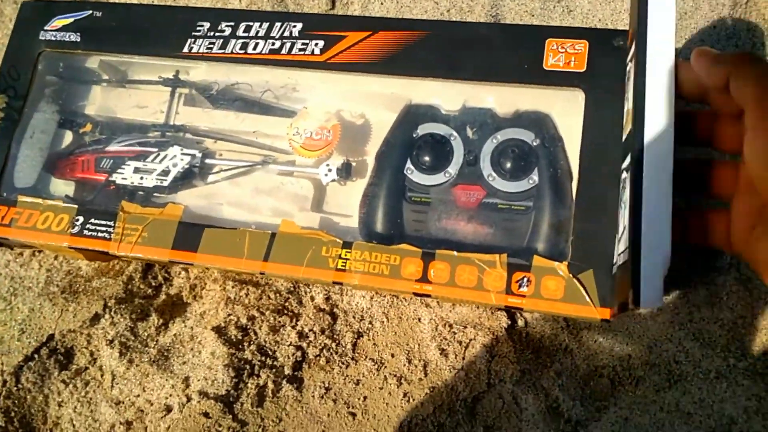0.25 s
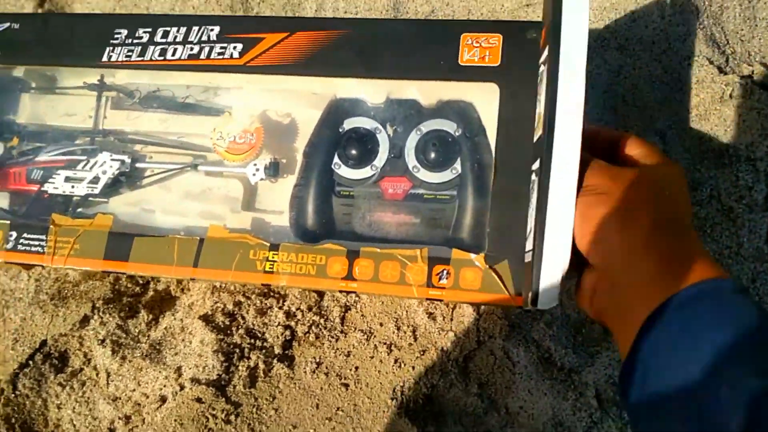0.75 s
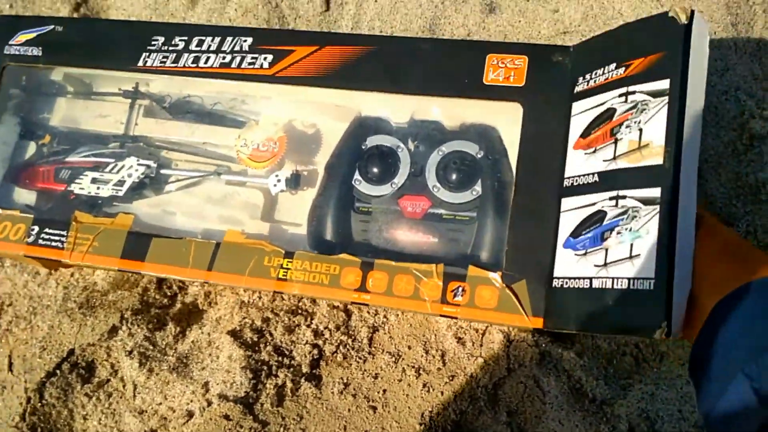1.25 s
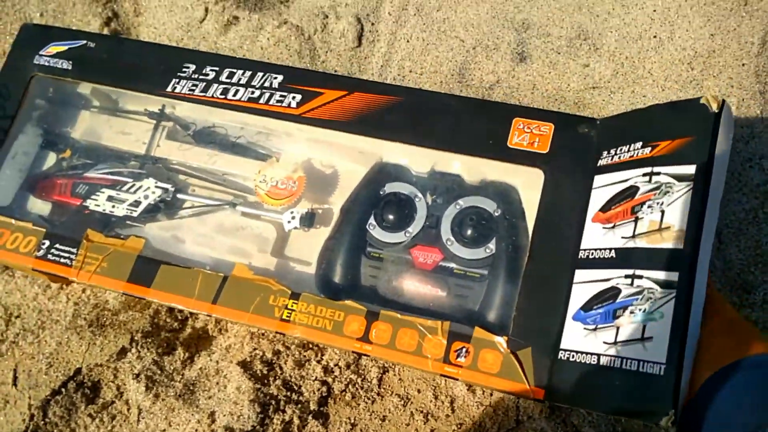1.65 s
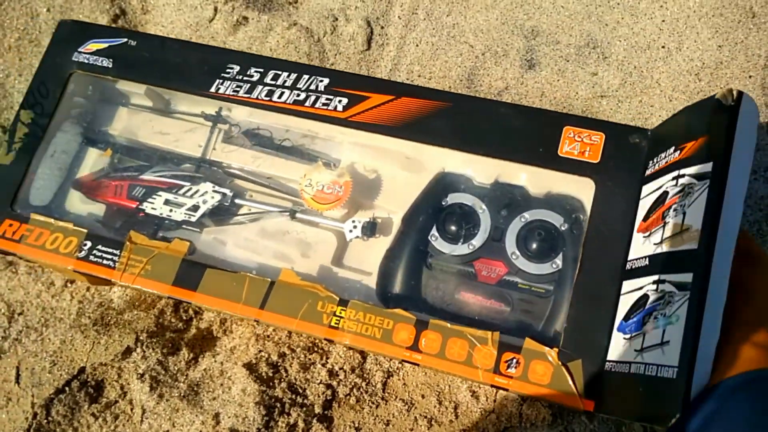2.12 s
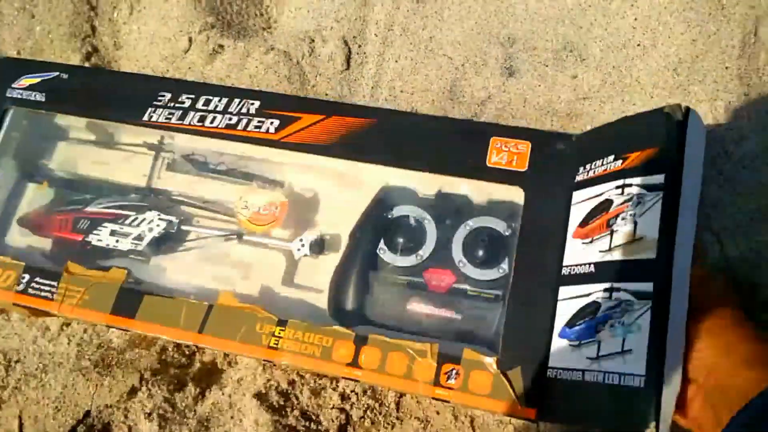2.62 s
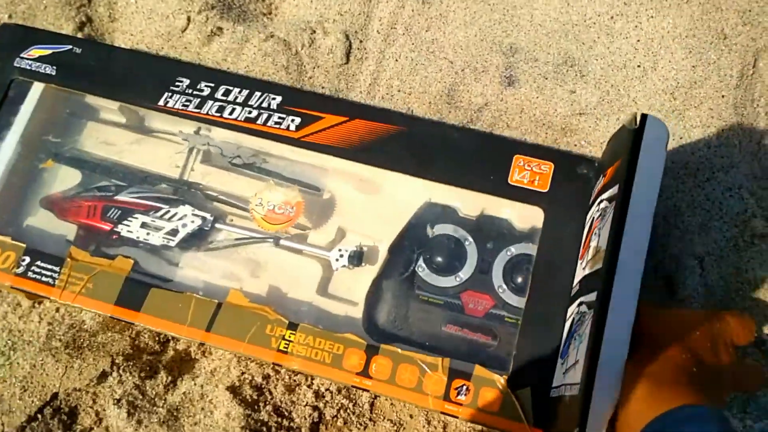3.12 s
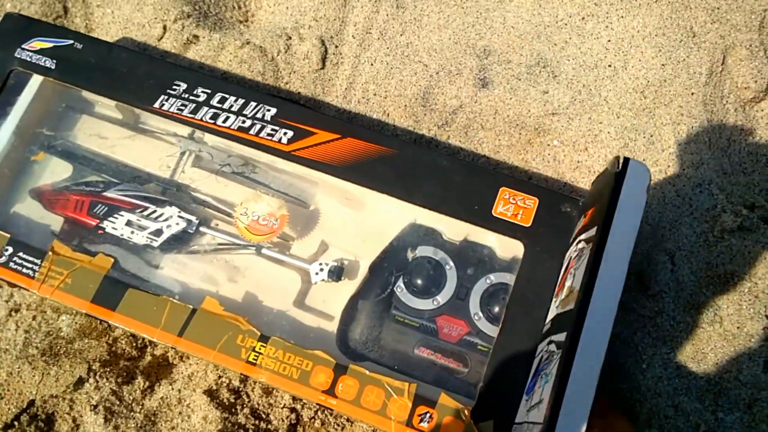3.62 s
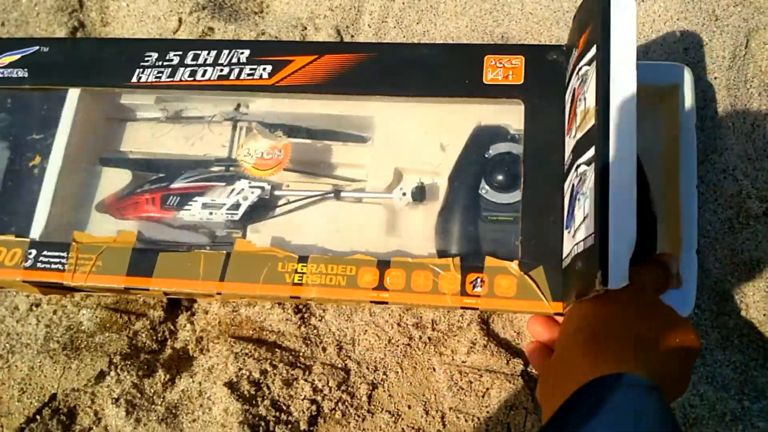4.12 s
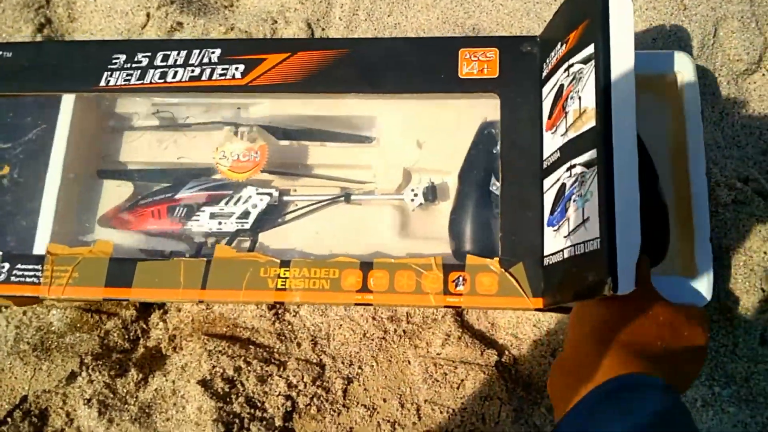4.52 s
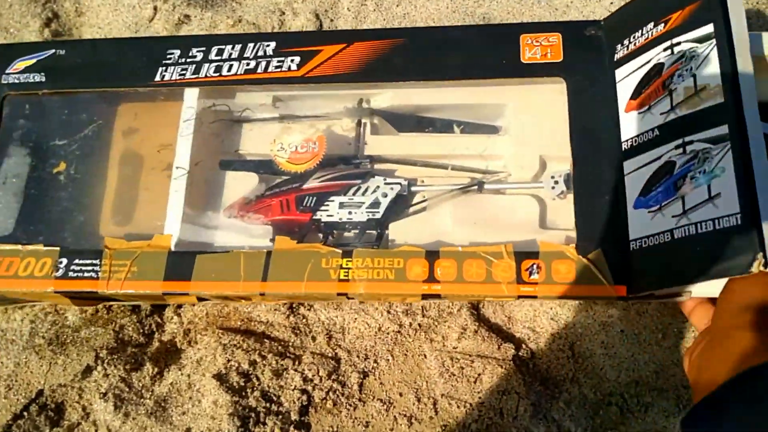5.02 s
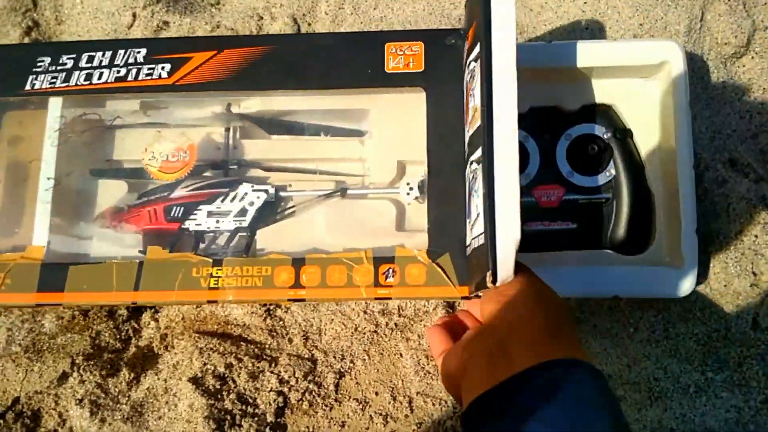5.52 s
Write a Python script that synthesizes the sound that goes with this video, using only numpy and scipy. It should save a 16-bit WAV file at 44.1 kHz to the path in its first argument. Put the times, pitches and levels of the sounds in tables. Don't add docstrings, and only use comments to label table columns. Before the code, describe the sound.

Fingers brush a thin cardboard box on sand with faint hiss and a few sharp ticks. From under two seconds, uneven jerks make the hollow box knock and crackle as foam rubs against card. A brief juddering creak leads into loud scraping slides with gritty sand crunches. Dry open air, close microphone, buffeting wind, loudest peaks slightly overloaded.

```python
import sys
import numpy as np
from scipy import signal
from scipy.fft import rfft, irfft, next_fast_len
from scipy.io import wavfile

SR = 44100
rng = np.random.default_rng(int(sys.argv[2]) if len(sys.argv) > 2 else 0)


def volts_from_decibels(level):
    exponent = np.asarray(level, float) / 20
    return 10 ** exponent


def put_to_file(sound):
    columns = np.atleast_2d(sound).T
    safe = np.clip(columns, -1, 1)
    whole_steps = np.round(safe * 32767)
    wavfile.write(sys.argv[1], SR, whole_steps.astype(np.int16))


N = 253575
LEFT_LAG_S = 8 / SR
BURST_SAMPLES = int(0.09 * SR)


def rms_one(x):
    return x / np.sqrt(np.mean(x ** 2) + 1e-20)


def in_time(rows):
    s, *columns = np.transpose(rows)
    return [np.interp(np.arange(N) / SR, s, c) for c in columns]


def at_hz(points, hz):
    point_hz, value = np.transpose(points)
    return np.interp(np.log(hz + 1), np.log(point_hz + 1), value)


def drift(rate_hz):
    r = np.exp(-2 * np.pi * rate_hz / SR)
    wander = signal.lfilter([1], [1, -2 * r, r * r], rng.standard_normal(N + SR))
    return rms_one(wander[SR:])


def slips(per_s, spread_db):
    born = rng.random(N) < per_s / SR
    size_db = spread_db * np.minimum(rng.exponential(1, N), 4)
    return born * volts_from_decibels(size_db) * rng.choice([-1, 1], N)


def burst(ms, rise_ms, tail):
    t_ms = np.arange(BURST_SAMPLES) / SR * 1000
    fall = np.exp(-np.maximum(t_ms - ms * 0.68, 0) / (tail * ms))
    return np.minimum(t_ms / rise_ms, 1) * fall


def add(out, s, piece):
    at = int(s * SR)
    out[at:at + len(piece)] += piece[:N - at]


def resonate(x, modes):
    out = 0
    for k, (hz, width_hz, level_db) in enumerate(modes):
        r = np.exp(-np.pi * width_hz / SR)
        poles = [1, -2 * r * np.cos(2 * np.pi * hz / SR), r * r]
        ringing = signal.lfilter([1 - r * r, 0, r * r - 1], poles, x + 1e-18)
        out = out + (-1) ** k * volts_from_decibels(level_db) * ringing
    return out


# f/Hz, left minus right level/dB
PORT_TILT = [(60, -6), (200, 0), (2400, 0), (4400, 2.5), (8100, -3.5), (12000, -4.5), (15000, -4)]
# f/Hz, shared part [0-1]
PORT_LIKENESS = [(300, 1), (1500, 0.9), (3000, 0.03), (6000, 0.08), (15000, 0)]


def port_noise(spectrum, share):
    size = next_fast_len(N)
    hz = np.arange(size // 2 + 1) * SR / size
    shared, left, right = rfft(rng.standard_normal((3, size)))
    alike = np.clip(share * at_hz(PORT_LIKENESS, hz), 0, 1)
    late = shared * np.exp(-2j * np.pi * hz * LEFT_LAG_S)
    pair = np.sqrt(alike) * np.array([late, shared]) + np.sqrt(1 - alike) * np.array([left, right])
    tilt = volts_from_decibels(at_hz(PORT_TILT, hz) / 2 * np.array([[1], [-1]]))
    return rms_one(irfft(pair * tilt * volts_from_decibels(at_hz(spectrum, hz)), size)[:, :N])


# f/Hz, level/dB per Hz
FLOOR_SPECTRUM = [(290, -45), (500, 7), (738, -3), (2310, -48), (2910, 6.5), (3880, 0), (6160, -42),
                  (11600, 11), (15700, -0.5)]


def outdoor_floor():
    return volts_from_decibels(-37) * port_noise(FLOOR_SPECTRUM, share=0.6)


# t/s, level/dB, left minus right level/dB
BREEZE = [(0.0, -30, 10), (0.06, -29, -13), (0.13, -32.5, 3), (0.7, -28.5, -11), (2.59, -34.5, 12.5),
          (2.83, -27.5, -8.5), (3.09, -37, 20), (3.55, -25.5, 17), (3.7, -34, 7), (4.36, -37.5, 9),
          (4.45, -25, -11), (4.58, -24, 9.5), (4.95, -26, -10.5), (5.03, -34, 14), (5.14, -23.5, -12),
          (5.49, -33.5, -5), (5.67, -22.5, -6.5), (5.75, -32.5, 9)]
# f/Hz, level/dB per Hz
GUST_SPECTRUM = [(8.8, -33), (15, -1), (86, -9), (152, -7), (190, -11), (336, -27), (420, -68), (550, -35),
                 (920, -120)]
# t/s, signed height [full scale]
LEFT_EDDIES = [(2.728, -0.34), (2.883, -0.3), (3.193, -0.31), (3.534, -0.16), (3.668, 0.43), (3.68, 0.43),
               (3.763, -0.37), (3.779, 0.25), (4.045, -0.36), (4.564, -0.36), (4.575, -0.41),
               (4.599, -0.22)]
# t/s, signed height [full scale]
RIGHT_EDDIES = [(0.066, 0.74), (0.092, 0.37), (0.421, 0.84), (.557, -.53), (0.823, 0.1), (0.945, 0.34),
                (1.139, 0.18), (1.25, 0.4), (1.573, -0.11), (1.928, -0.23), (1.958, 0.54), (2.836, 0.24),
                (4.448, -0.00016), (4.471, 0.092), (4.545, -0.38), (4.559, .26), (4.729, 0.54),
                (4.895, 0.68), (4.927, -0.9), (5.131, 0.047), (5.148, -0.22), (5.419, 0.13), (5.58, 0.26),
                (5.634, 0.044)]


def wind():
    level_db, pan_db = in_time(BREEZE)
    left_db = level_db + pan_db / 2 + 5.76 * drift(6.0)
    right_db = level_db - pan_db / 2 + 5.0 * drift(26)
    turbulence = volts_from_decibels([left_db, right_db]) * port_noise(GUST_SPECTRUM, share=0.02)
    t = np.arange(-300, 300) / SR
    pressure = np.exp(-(t / 0.00091) ** 2)
    swing_back = 0.44 * np.exp(-((t - 0.0027) / 0.0016) ** 2)
    thumps = np.zeros((2, N))
    for port, eddies in zip(thumps, (LEFT_EDDIES, RIGHT_EDDIES)):
        for s, height in eddies:
            add(port, s + t[0], 1.48 * height * (pressure - swing_back))
    return volts_from_decibels(0.5) * turbulence + thumps


# middle t/s, half-length/s, level/dB
DRAGS = [(0.702, 0.023, -37), (0.962, 0.054, -37.5), (2.467, 0.017, -34), (2.91, 0.074, -29),
         (3.633, 0.013, -27.5), (4.77, 0.073, -33), (4.872, 0.042, -16.5), (5.015, 0.023, -24.5),
         (2.05, .04, -36), (2.2, 0.037, -33.5), (2.556, 0.026, -33), (2.62, 0.046, -32.5),
         (4.68, 0.024, -37), (4.959, .04, -39), (5.063, 0.02, -37), (1.244, 0.014, -49)]


def sand():
    t = np.arange(N) / SR
    swell = sum(volts_from_decibels(db) * np.exp(-((t - s) / half_s) ** 2) for s, half_s, db in DRAGS)
    grain_band = signal.butter(2, [1480, 3850], "band", fs=SR, output="sos")

    def grains():
        return rms_one(signal.sosfilt(grain_band, slips(per_s=3000, spread_db=5.5)))

    shared = grains()
    late = np.roll(shared, round(LEFT_LAG_S * SR))
    own = np.array([grains(), grains()])
    return swell * (np.array([late, shared]) + 1.05 * own)


# t/s, hiss level/dB
GRIP = [
    (0, -33.5),
    (.45, -28.5),
    (1.1, -28.5),
    (1.6, -40),
    (1.8, -51),
    (2.4, -37.5),
    (2.8, -28.5),
    (3.55, -36.5),
    (3.76, -44),
    (5.75, -53),
]
# peak t/s, swell/s, stop/s, hiss level/dB, drumming level/dB
TUGS = [(0.01, .1, 0.31, -52, -38.5), (.6, 0.077, .15, -32, -37), (.71, 0.31, 0.21, -24, -33),
        (.8, 0.055, .12, -38, -39), (.95, 0.049, 0.26, -24.5, -40), (1.23, 0.2, 0.25, -56, -32.5),
        (1.43, 0.25, 0.91, -29, -36), (1.6, 0.19, 0.21, -28, -47), (1.69, .3, 0.14, -46, -29.5),
        (1.82, 0.015, 0.38, -48, -20.5), (1.94, 0.12, 0.091, -36, -25.5), (2.02, 0.039, 0.39, -25, -19),
        (2.194, 0.18, 0.055, -18.5, -25.5), (2.45, 0.058, 0.055, -17, -19),
        (2.567, 0.082, 0.27, -15.5, -20), (2.905, 0.12, 0.15, -21, -16), (3.155, 0.09, 0.12, -25.5, -21.5),
        (3.248, 0.018, 0.062, -43, -6), (3.51, 0.36, 0.36, -26, -28), (3.65, 0.054, 0.12, -36, -24.5)]
# peak t/s, swell/s, stop/s, hiss level/dB, drumming level/dB
SLIDES = [(3.839, 0.052, 0.18, -20.5, -18.5), (3.96, 0.036, 0.2, -22.5, -41), (4.05, 0.051, 0.31, -42, -20),
          (4.078, 0.033, 0.044, -18, -20), (4.16, 0.25, 0.29, -21.5, -19.5),
          (4.327, 0.098, 0.052, -7, -6.5), (4.381, 0.4, 0.031, -22, -15), (4.49, 0.28, 0.12, -29, -32.5),
          (4.78, 0.17, 0.43, -18, -21.5), (4.848, 0.017, 0.27, -11, -13), (4.91, 0.3, 0.25, -26, -14),
          (5.03, 0.28, 0.052, -23.5, -20.5), (5.2, 0.7, 0.032, -23, -39), (5.353, 0.095, 0.19, -14, -24.5),
          (5.51, 0.071, 0.61, -25, -48), (5.566, 0.12, 0.02, -7.5, -18.5), (5.6, 0.062, 0.14, -25.5, -23.5),
          (5.749, 0.021, 0.085, -33, -44)]


def effort():
    stroke_range_db = 20
    grip_drum_db = -20
    rest_db, = in_time(GRIP)
    rest = volts_from_decibels(2 * np.array([rest_db, rest_db + grip_drum_db]))
    t = np.arange(0, N, 20) / SR
    s, swell, stop, hiss_db, drum_db = np.transpose(TUGS + SLIDES)[:, :, None]
    shape_db = -stroke_range_db * np.maximum((s - t) / swell, (t - s) / stop)
    strokes = []
    for peak_db in (hiss_db, drum_db):
        power = np.sum(volts_from_decibels(2 * (peak_db + shape_db)), axis=0)
        strokes.append(np.interp(np.arange(N) / SR, t, power))
    return 10 * np.log10(strokes + rest)


# t/s, peak level/dB
TICKS = [
    (0.45, -32),
    (0.529, -32),
    (0.557, -10.5),
    (0.975, -16.5),
    (1.046, -13),
    (1.114, -12.5),
    (1.425, -14),
    (1.63, -16),
]
# t/s, peak level/dB
SNAPS = [(1.667, -7.5), (2.087, -15), (2.147, -7.5), (2.24, -1.5), (2.422, -9), (2.442, -7), (2.475, -11.5),
         (3.177, -13.5), (3.286, -20), (2.898, -10), (2.919, 1.5), (2.965, -7.5), (3.806, -13.5),
         (3.906, 0), (4.007, 0), (4.081, -6), (4.109, -4.5), (4.13, 1), (4.152, -4), (4.163, -1.5),
         (4.171, -10), (4.203, -9), (4.27, -12), (4.185, -2), (4.212, -3.5), (4.24, -6), (4.257, -13),
         (4.828, 0), (4.942, -11)]
# t/s, peak level/dB, length/ms, dull minus bright level/dB
CRACKS = [(1.61, -11.5, 2.2, 2), (1.795, -3, 5.3, 2), (1.84, -5, 6.5, 3), (1.897, -15, 5.7, 9),
          (1.944, -16.5, 6.6, -1), (1.991, 1.5, 4.5, -3.5), (2.008, -2.5, 6.3, 1), (2.364, -24, 1.6, 22),
          (2.518, -12, 2.7, 22), (2.567, -3, 5.8, 10), (2.8, 2, 2.65, -2), (3.13, -4, 1.8, -8),
          (3.145, -15.5, 17, -1), (3.236, -6, 14, -11), (3.251, -1, 9.2, -4), (3.263, 3, 4.4, -1),
          (3.626, -17.5, 11, -5), (3.815, -7, 3.9, -1), (4.146, 1, 2.9, -3), (4.539, -13, 1.6, -4),
          (4.759, 3, 1, 2), (5.143, -21, 4.6, 6), (5.226, -14.5, 3.6, -1), (5.423, -17, 15.3, 18)]


def cracks():
    ticks = [(s, db, 3.1, -16) for s, db in TICKS]
    snaps = [(s, db, 5.5, -7.5) for s, db in SNAPS]
    dull, bright = np.zeros((2, N))
    for s, peak_db, ms, tilt_db in CRACKS + ticks + snaps:
        dull_share = 1 / (1 + volts_from_decibels(-2 * tilt_db))
        shape = volts_from_decibels(peak_db - 3) * burst(ms, rise_ms=1.3, tail=0.4)
        add(dull, s, np.sqrt(dull_share) * shape)
        add(bright, s, np.sqrt(1 - dull_share) * shape)
    return dull, bright


# f/Hz, level/dB per Hz
HISS_SPECTRUM = [(880, -10), (1500, -3.5), (1760, -5), (1940, -6.5), (2480, -7), (3200, -7), (4930, -4.5),
                 (9430, 0.5), (12100, 6), (15700, -5)]


def surface(hiss_db, drum_db):
    dull_db = hiss_db - 7.5 + 0.24 * (drum_db - hiss_db)
    grit = signal.lfilter([1], [1, -0.985], np.abs(slips(per_s=270, spread_db=6.0)))
    flicker = rms_one(1 + 0.14 * grit)
    rubbed_dull = volts_from_decibels(dull_db - 0.6 + 1.6 * drift(30)) * flicker
    rubbed_bright = volts_from_decibels(hiss_db - 0.25 + 0.64 * drift(21)) * flicker
    cracked_dull, cracked_bright = cracks()
    noise = port_noise(HISS_SPECTRUM, share=0.97)
    dull = signal.sosfiltfilt(signal.butter(4, 6000, fs=SR, output="sos"), noise)
    dull_part = rms_one(dull) * np.hypot(rubbed_dull, cracked_dull)
    bright_part = rms_one(noise - dull) * np.hypot(rubbed_bright, cracked_bright)
    return dull_part + bright_part


def shove(s, ms, grain, tail, contact_db):
    push = burst(ms, rise_ms=0.3, tail=tail) * np.resize(grain[int(s * SR):], BURST_SAMPLES)
    push[0] += volts_from_decibels(contact_db) / ms
    return push


# t/s, peak level/dB, length/ms, ring f/Hz
CLACKS = [(1.844, -5, 3, 5200), (1.899, -22, 3, 3300), (1.992, -10, 4, 3150), (2.147, -15, 3, 3100),
          (2.3466, -27, 2, 5460), (2.366, -5.5, 2.3, 2800), (2.441, -12, 4, 5700), (2.516, -2, 2.5, 2600),
          (2.5356, -23, 3, 5300), (2.568, 1, 4.6, 3240), (2.803, -12, 3.3, 4670), (3.908, -1, 3.8, 2580),
          (3.958, -13.5, 4, 1900), (4.073, -8, 4.3, 4460), (4.7563, -3, 5.5, 4870), (4.777, -6, 3.8, 2500),
          (4.804, -6, 4.5, 2400), (4.848, 2, 3, 2490), (5.008, -6, 4.3, 2450), (5.025, -11, 4, 2700),
          (1.609, -25, 3, 2170), (.705, -15, 9, 2200)]


def clacks(grain):
    out = np.zeros(N)
    width_hz = 450
    for s, peak_db, ms, hz in CLACKS:
        push = shove(s, ms, grain, tail=0.2, contact_db=24)
        narrow = resonate(push, [(hz, width_hz, 0)])
        clack = resonate(narrow, [(hz, 4 * width_hz, 0)])
        add(out, s, volts_from_decibels(peak_db) * clack / np.abs(clack).max())
    return out


# t/s, peak level/dB
JUDDER = [
    (3.4295, -12.5),
    (3.4642, -13),
    (3.4835, -12.5),
    (3.502, -12),
    (3.5203, -12),
    (3.5389, -13.5),
    (3.558, -20),
    (3.568, -31),
]


def creaks():
    out = np.zeros(N)
    lead_s, lead_db = 0.007, -8.5
    soft_click = np.pad(np.hanning(20), (0, 1500))
    creak = resonate(soft_click, [(166, 170, -1), (1050, 570, -22)])
    creak = creak / creak.max()
    for s, peak_db in JUDDER:
        add(out, s, volts_from_decibels(peak_db + 4.5) * creak)
        add(out, s - lead_s, volts_from_decibels(peak_db + 2.0 + lead_db) * creak)
    return out


# f/Hz, width/Hz, level/dB
BOX_DEEP = [(310, 119, -2), (417, 81, 2), (480, 84, 1), (528.3, 93, -2.5)]
# f/Hz, width/Hz, level/dB
BOX_PANELS = [(730, 153, 1.5), (870, 62, 9), (1024, 178, 6), (1345, 304, 3.5), (1408, 210, -0.5),
              (1782, 52, -4.5), (2500, 123, -3)]
# t/s, peak level/dB, length/ms, wall or panel f/Hz
JERKS = [(1.185, -30, 18, 350), (1.375, -19, 9.4, 340), (1.795, -4, 15, 418), (1.842, -3.5, 6.7, 480),
         (1.912, -1.5, 1.6, 480), (1.92, -1, 3.2, 530), (2.007, -2.5, 38, 357), (2.123, 1.5, 2.9, 400),
         (2.231, -13, 5.5, 310), (2.28, -16, 8.1, 506), (2.301, -15.5, 7.3, 503), (2.428, -12, 7, 324),
         (2.59, -11, 4.2, 320), (2.865, -8.5, 3.7, 310), (2.918, -5.5, 6.1, 420), (3.234, -14, 41, 523),
         (3.248, -5, 27, 293), (3.627, -8.5, 23, 377), (3.64, -9.5, 8.4, 340), (4.011, -5, 7.7, 430),
         (4.057, -13, 22, 355), (4.212, -2.5, 7.7, 420), (4.239, -6, 14, 450), (4.313, 2.5, 34, 420),
         (4.506, -20, 12, 390), (5.104, -15, 8.8, 410), (5.143, -16.5, 5.7, 230), (5.36, -1, 2.7, 405),
         (5.429, -11.5, 8.4, 376), (5.497, -10, 8, 410),
         (0.129, -28.5, 7.8, 1090), (0.501, -33, 4.9, 860), (.7, -26, 14, 910), (.945, -24, 5.3, 820),
        (1.237, -18.5, 17, 1130), (1.529, -21.5, 8.6, 1145), (1.831, -10, 4.4, 870), (1.899, -7, 2.9, 890),
        (1.946, -12.5, 12.7, 1050), (2.013, -9, 11, 975), (2.148, -10, 8, 940), (2.366, -10, 3.1, 1280),
        (2.57, 3.5, 3.5, 1274), (2.797, -8, 15, 1350), (3.817, 1, 5.2, 1200), (3.84, -11, 4.8, 1050),
        (3.871, -12, 3.7, 1220), (3.895, -11, 3.4, 1200), (3.908, -2.5, 5, 1240), (4.01, -2, 4.3, 1194),
        (4.166, -11, 9, 1610), (4.32, -5, 13, 1050), (5.009, -4, 7.3, 1810), (5.008, -9, 1.66, 1250),
        (5.011, -18, 15, 1090), (2.517, -13.5, 4.1, 1150), (1.992, -9, 7.6, 1010), (5.225, -24, 5.1, 1130),
        (5.143, -18, 5, 1140), (5.053, -9.5, 3.1, 1840),
         (.61, -33, 16, 1200), (0.995, -32, 3.5, 528), (1.007, -23.5, 3.9, 517), (1.187, -26, 12, 1160),
          (1.476, -24, 10, 853), (1.651, -24, 17, 1110), (1.95, -9, 6.7, 523), (2.018, -4, 16, 542),
          (2.03, -9.5, 17, 906), (2.059, -20, 12, 300), (4.011, -9, 5.2, 1460), (4.09, -20, 15, 1430),
          (3.629, -11.5, 13, 1120), (2.829, -16, 5.8, 318), (2.867, -22, 3.3, 1020), (2.9, -16, 5, 350),
          (2.903, -17, 6, 1030), (2.924, -8.5, 8.7, 1030), (2.966, -10, 5, 336), (3.014, -19.5, 6.8, 1110),
          (3.147, -21, 6.9, 424), (3.236, -7, 4, 480), (3.262, -5.5, 11, 970), (3.796, -23, 3, 400),
          (4.114, -16, 4.3, 393), (4.172, -8.5, 4.8, 414), (4.283, -11, 7.3, 890), (4.655, -24, 6.8, 260),
          (4.756, -16, 6, 426), (4.803, -10, 6.3, 376), (4.831, -13, 6, 323), (4.971, -10, 5.6, 340),
          (4.975, -22, 6.7, 1050), (5.053, -15, 7, 390)]


def jerks(grain):
    out = np.zeros(N)
    for s, peak_db, ms, hz in JERKS:
        push = shove(s, ms, grain, tail=0.15, contact_db=28.5)
        near = [(f, width, db - 7 * abs(np.log2(f / hz))) for f, width, db in BOX_DEEP + BOX_PANELS]
        whole = resonate(push, near)
        single = resonate(push, [(hz, 60 + 250 / ms, 0)])
        add(out, s, volts_from_decibels(peak_db - 7.0) * whole / np.abs(whole).max())
        add(out, s, volts_from_decibels(peak_db + 1.5) * single / np.abs(single).max())
    return out


def box(hiss_db, drum_db):
    panel_db = drum_db - 6 + 0.07 * (hiss_db - drum_db)
    drive = slips(per_s=800, spread_db=3.5) * volts_from_decibels(2.2 * drift(25))
    deep = volts_from_decibels(drum_db - 1.5) * rms_one(resonate(drive, BOX_DEEP))
    panels = volts_from_decibels(panel_db + 2.5) * rms_one(resonate(drive, BOX_PANELS))
    grain = slips(per_s=2500, spread_db=4)
    sound = deep + panels + jerks(grain) + clacks(grain) + creaks()
    late = np.interp(np.arange(N) - 6, np.arange(N), sound)
    aside = np.array([slips(per_s=700, spread_db=-1.5), slips(per_s=840, spread_db=1.5)])
    return np.array([late, sound]) + volts_from_decibels(panel_db - 4) * rms_one(resonate(aside, BOX_PANELS))


def scene():
    hiss_db, drum_db = effort()
    background = outdoor_floor() + wind() + sand()
    return background + surface(hiss_db, drum_db) + box(hiss_db, drum_db)


def low_pass(x):
    return signal.sosfilt(signal.butter(12, 15650, fs=SR, output="sos"), x)


def record(dry):
    limited = np.clip(1.1 * np.tanh(dry / 1.1), -0.92, 0.92)
    top_cut = signal.cheby2(14, 62, 16350, fs=SR, output="sos")
    mix = signal.sosfilt(top_cut, limited)
    return low_pass(mix)


dry = scene()
out = record(dry)
put_to_file(out)
```